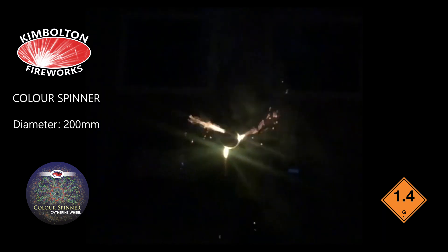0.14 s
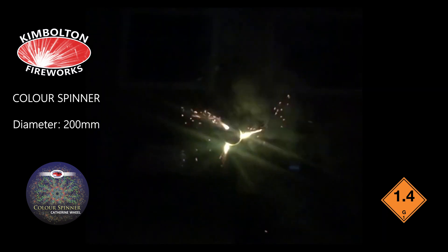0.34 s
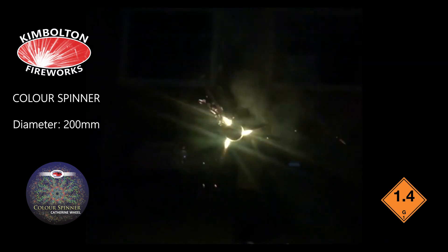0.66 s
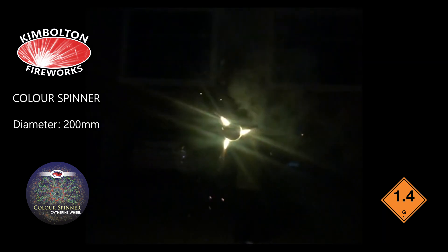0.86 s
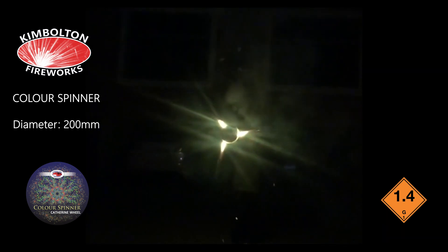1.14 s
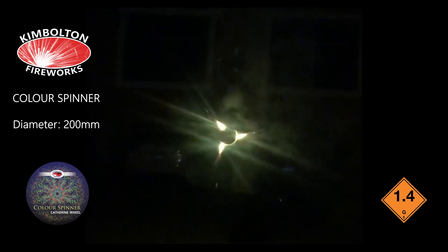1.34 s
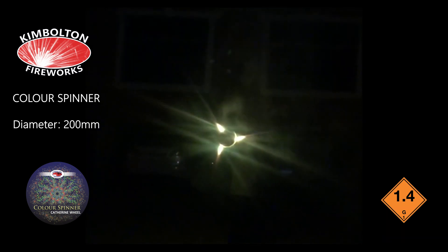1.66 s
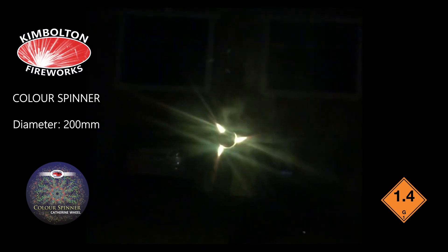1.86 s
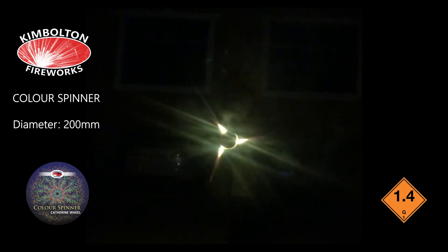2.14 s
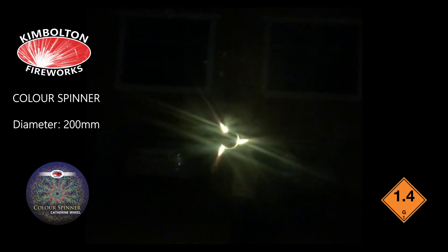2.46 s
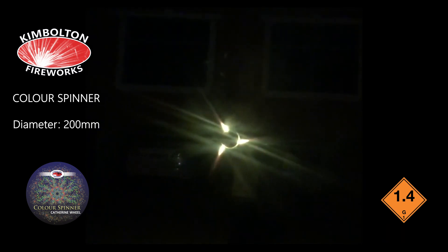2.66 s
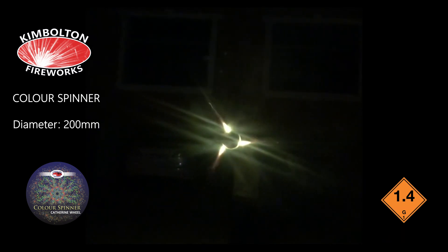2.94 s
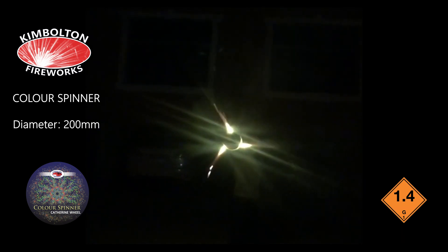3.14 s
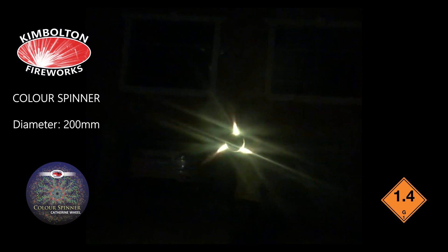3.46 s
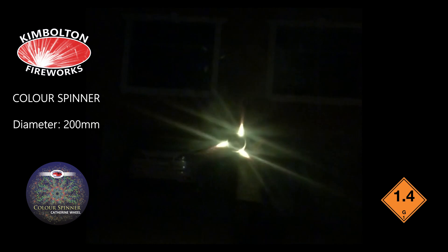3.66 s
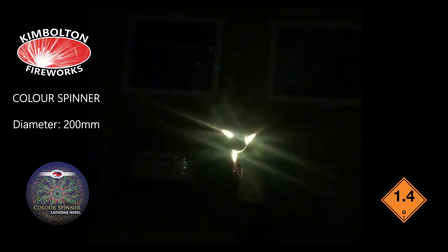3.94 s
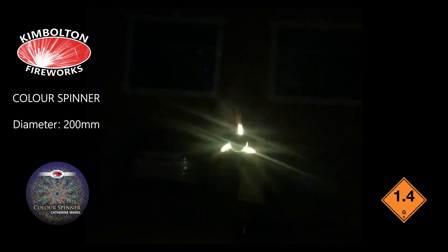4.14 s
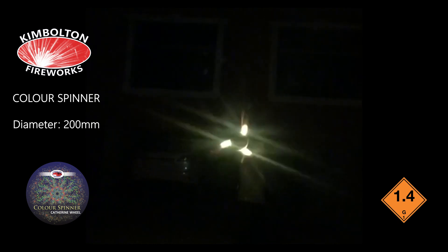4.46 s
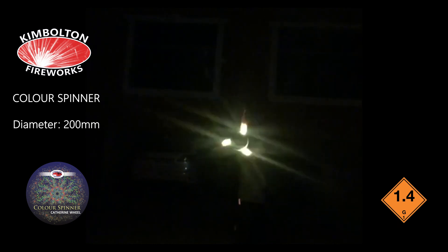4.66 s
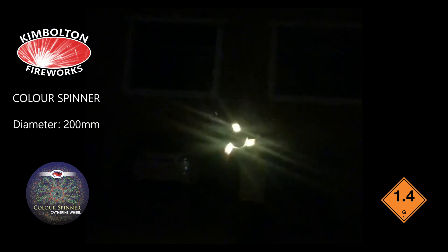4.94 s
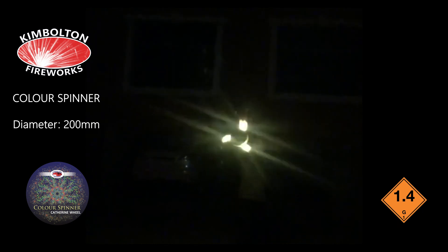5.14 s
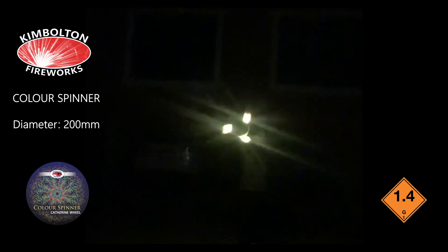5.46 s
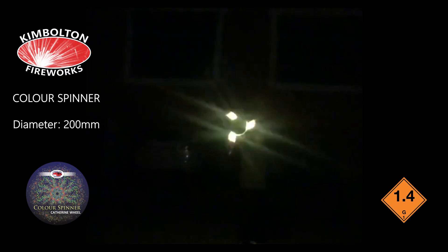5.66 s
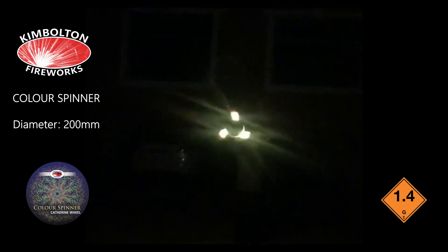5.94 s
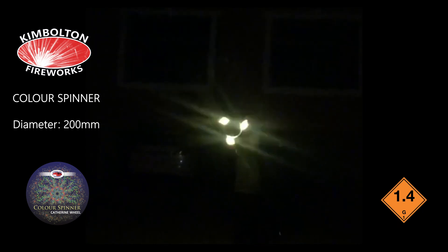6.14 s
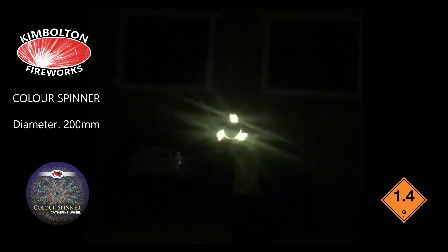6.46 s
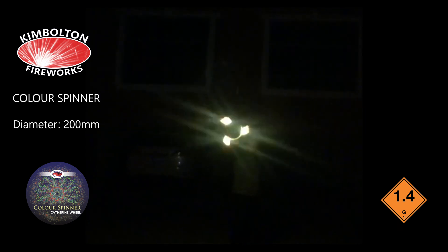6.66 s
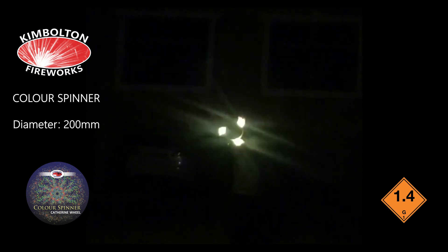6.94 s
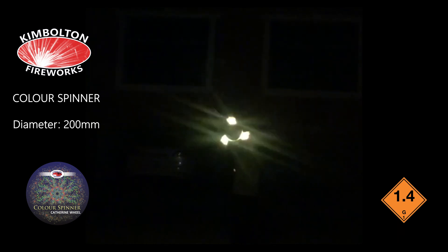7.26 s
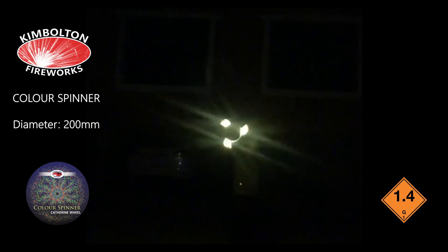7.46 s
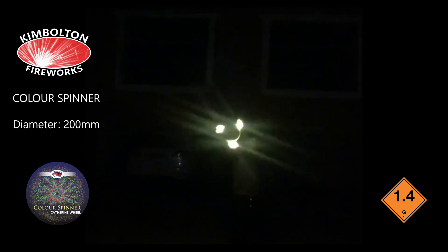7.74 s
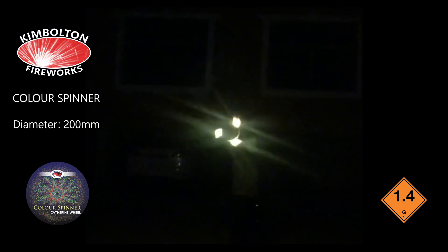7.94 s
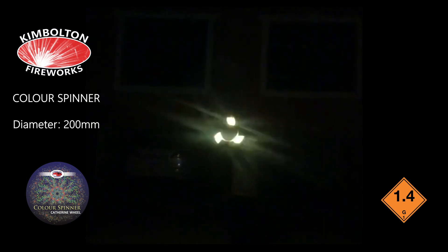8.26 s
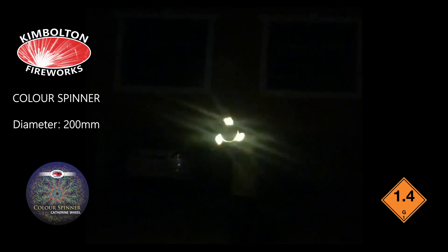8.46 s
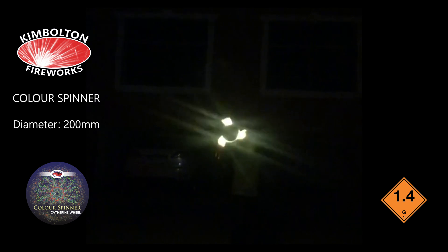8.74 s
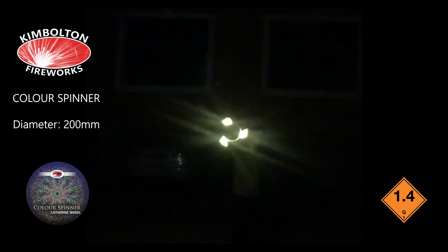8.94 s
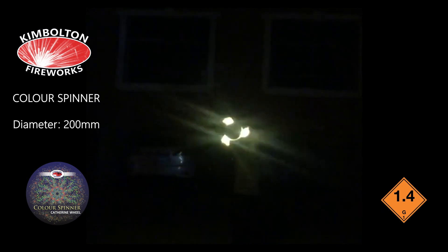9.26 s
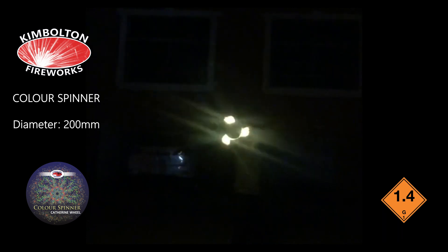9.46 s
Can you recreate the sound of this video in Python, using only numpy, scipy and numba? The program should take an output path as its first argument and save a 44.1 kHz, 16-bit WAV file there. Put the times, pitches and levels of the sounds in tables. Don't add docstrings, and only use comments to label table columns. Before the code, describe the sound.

Night, outdoors, a small three-jet firework wheel on a post some metres from one microphone. At 0 s a thin high fizz accompanies a low airy whoomph and second puff; the fuse dies around 0.3 s. Near 0.5 s further jets catch with softer puffs, a slow low bloom and a short rising hollow whoop. From 1 to 3.5 s the breathy roar and bright hiss swell strongly, with noisy ringing around the paper tubes. The wheel nudges at about 3.1 s, breaks free near 3.3 s and accelerates, turning the hiss into quickening swishes. Dull knocks of air come around 5.45 s. The rush then eases to a moderate, fast flutter, its narrower whistle sinking in pitch, broken by spits, chuffs and chokes. Low rumble, ground echo and faint distant hum remain; treble is grainy. It is still burning at 9.6 s.

```python
import sys
import numpy as np
from scipy import signal
from scipy.fft import rfft, irfft
from scipy.io import wavfile
from scipy.ndimage import uniform_filter1d, minimum_filter1d, map_coordinates
from numba import njit

SR = 44100
rng = np.random.default_rng(int(sys.argv[2]) if len(sys.argv) > 2 else 0)


def master_out(mix):
    frames = np.transpose(np.atleast_2d(mix))
    ceiling = np.clip(frames, -1, 1)
    pcm = np.round(ceiling * 32767).astype(np.int16)
    wavfile.write(sys.argv[1], SR, pcm)


def convert_level_to_amplitude(level_db):
    exponent = np.asarray(level_db, float) / 20
    return 10 ** exponent


N = 423360
TIME_S = np.arange(N) / SR


def curves(table):
    s, *columns = np.transpose(table)
    return [np.interp(TIME_S, s, column) for column in columns]


def unit(x):
    return x / np.sqrt(np.mean(x ** 2))


def white():
    return rng.standard_normal(N)


def coloured(colour):
    hz, db = np.transpose(colour)
    f = np.arange(N // 2 + 1) * SR / N + 1
    gain = convert_level_to_amplitude(np.interp(np.log(f), np.log(hz), db))
    return unit(irfft(rfft(white()) * gain, N))


@njit
def svf(x, hz, width_hz):
    y, band, low = np.empty(len(x)), 0., 0.
    for i in range(len(x)):
        g = np.tan(np.pi * hz[i] / SR)
        k = width_hz[i] / hz[i]
        v = (band + g * (x[i] - low)) / (1 + g * (g + k))
        band = 2 * v - band
        low = low + 2 * g * v
        y[i] = k * v
    return y


def ring(x, hz, width_hz):
    hz, width_hz = hz + np.zeros(N), width_hz + np.zeros(N)
    once = svf(x, hz, width_hz)
    return unit(svf(once, hz, width_hz) / np.sqrt(width_hz))


def walk(rate_hz):
    hold = int(SR / rate_hz)
    steps = np.repeat(rng.standard_normal(N // hold + 1), hold)
    x = uniform_filter1d(uniform_filter1d(steps, hold), hold)[:N]
    return unit(x - uniform_filter1d(x, size=4 * hold))


def fuse():
    end_s, fade_s = 0.33, .04
    alive = 1 / (1 + np.exp(np.clip((TIME_S - end_s) / fade_s, -30, 30)))
    return ring(white(), 11000., 4000.) * convert_level_to_amplitude(-48 + 1.3 * walk(29)) * alive


# start_s, level_db, hold_s, fall_db_per_s, rumble_db (over the whoomph)
IGNITIONS = [
    (0, -41, 0.12, 307, -14),
    (0.11, -40, .02, 300, -17),
    (0.466, -41.5, 0.17, 90, -8),
    (.53, -41, .02, 200, -8),
    (.62, -41, .03, 200, -8),
    (0.504, -43, 0.26, 12, -12),
]


def puffs(rumble=False):
    power = 0
    for s, db, hold_s, fall_db_s, low_db in IGNITIONS:
        rise_db = 82 * np.maximum(s - TIME_S, 0)
        fall_db = fall_db_s * np.maximum(TIME_S - s - hold_s, 0)
        power = power + convert_level_to_amplitude(db + rumble * low_db - rise_db - fall_db) ** 2
    return np.sqrt(power)


# pitch_hz, level_db (per Hz)
WHOOMPH_COLOUR = [(40, -28), (90, -35), (200, 2.5), (350, 1.5), (550, 1), (900, -1), (1800, -21.5)]
# time_s, pitch_hz, level_db
WHOOP = [
    (.44, 350, -70),
    (.48, 370, -52),
    (.56, 406, -53),
    (.62, 470, -47),
    (.7, 520, -54),
    (.8, 500, -70),
]


def whoomph():
    whoop_hz, whoop_db = curves(WHOOP)
    return coloured(WHOOMPH_COLOUR) * puffs() + ring(white(), whoop_hz, 49.0) * convert_level_to_amplitude(whoop_db)


# pitch_hz, level_db (per Hz)
RUMBLE_COLOUR = [(20, -56), (32, -41), (50, -14.5), (75, -8), (130, -0.5), (200, -3.5), (300, -23),
                 (600, -22.5)]
# centre_s, level_db, half_length_s, pitch_hz
KNOCKS = [(.12, -56, .025, 55), (.41, -55, .03, 140), (.52, -54, .03, 65), (.535, -51, .025, 135),
          (.635, -50, .03, 95), (.64, -55, .025, 60), (1.08, -55, .03, 110), (3.59, -53, 0.091, 132),
          (4.8, -54, .04, 140), (5.435, -47, .022, 76), (5.45, -52, .03, 135), (5.45, -52, .025, 185),
          (5.465, -59, .03, 50), (5.478, -51, .02, 102), (7.88, -60, .09, 64)]
# pitch_hz, level_db, width_hz
HUM = [
    (154.3, -66.5, 8.3),
    (211, -66.5, 8),
]


def low_air():
    air = coloured(RUMBLE_COLOUR) * np.hypot(convert_level_to_amplitude(-55), puffs(rumble=True))
    for s, db, half_s, hz in KNOCKS:
        t = TIME_S - s
        air = air + convert_level_to_amplitude(db) * np.exp(-(t / half_s) ** 4) * np.sin(2 * np.pi * hz * t)
    for hz, db, width_hz in HUM:
        air = air + convert_level_to_amplitude(db) * ring(white(), hz, width_hz)
    return air


# time_s, level_db
BURN = [(0, -43), (.12, -41), (.18, -36.5), (.35, -39.5), (.45, -42), (.75, -42.5), (1.05, -40.5),
        (1.35, -37.5), (2.0, -31.5), (2.8, -29), (3.5, -26.5), (4.9, -27.5), (5.4, -31.5), (5.9, -34),
        (7.1, -36), (8.1, -34.5), (9.6, -34)]


def burn():
    hiss_db, = curves(BURN)
    young_db = -5 * np.exp(-TIME_S / 0.55)
    roar_db = -33 + 0.27 * (hiss_db + 29.5) + young_db
    return roar_db, hiss_db


# pitch_hz, level_db (per Hz)
ROAR_COLOUR = [(120, -45), (230, -11.5), (330, -6.5), (500, -5.5), (900, -0.5), (1300, -1), (1700, 0),
               (2100, -5.5), (2600, -3), (4500, -9.5), (9000, -34.5)]


def flame_roar(flutter):
    return coloured(ROAR_COLOUR) * convert_level_to_amplitude(burn()[0] + 0.1 * flutter)


def walls():
    return coloured(ROAR_COLOUR) * convert_level_to_amplitude(burn()[0] - 6.0)


# pitch_hz, level_db (per Hz)
HISS_COLOUR = [(600, -51), (1500, -4), (2500, -2.5), (4500, -2), (6500, -1), (8500, -3.5), (10500, -11),
               (13000, -17.5), (16000, -22)]


def nozzle_hiss(flutter):
    hiss_db = burn()[1]
    flare = flare_db()
    hiss = coloured(HISS_COLOUR) * convert_level_to_amplitude(hiss_db + 0.79 * flutter + flare)
    fizz_db = -51.0 + 3.0 * (hiss_db + 31) + 0.52 * flare + walk(34)
    return hiss + ring(white(), 11040.0, 5200.0) * convert_level_to_amplitude(fizz_db)


# time_s, main_hz, upper_hz, main_width_hz
TUBE_PITCH = [(0, 3060, 4200, 1200), (.45, 2950, 3600, 1200), (1.0, 3100, 3840, 1200),
              (1.38, 3300, 3840, 1100), (1.45, 3280, 4280, 910), (1.7, 3330, 4300, 950),
              (2.2, 3400, 4000, 1150), (2.4, 3460, 5200, 1150), (3.0, 3300, 5900, 800),
              (3.9, 3110, 5900, 800), (4.7, 3060, 5830, 450), (5.4, 2900, 5440, 350),
              (5.7, 2830, 4450, 300), (6.5, 2620, 4450, 260), (7.6, 2530, 4450, 220),
              (8.5, 2450, 4450, 220), (9.6, 2260, 4450, 260)]
# time_s, ring_db (over the burn), upper_db (over the main ring)
TUBE_LEVEL = [(0, -5, 2), (.45, 1, 0), (.75, 9, -16), (1.4, 5, -2.5), (1.47, 5.5, -1), (1.9, 4, -4),
              (2.3, 3.5, -15), (3.0, 1, -3.5), (3.8, -0.5, -9), (4.2, 2, -4), (4.8, -2.5, -8),
              (5.5, -1.5, -5), (6.0, -0.5, -8), (6.5, 0, -10), (7.1, -6, -9), (7.6, -1, -10), (8.5, -5, -6),
              (9.6, -5.5, -3)]


def paper_tube(detune, sputter_db):
    main_hz, upper_hz, width_hz = curves(TUBE_PITCH)
    over_db, upper_db = curves(TUBE_LEVEL)
    main = ring(white(), main_hz * detune * (1 + 0.014 * walk(6)), width_hz) * convert_level_to_amplitude(0.5 * walk(16))
    upper_width_hz = 640 * (upper_hz / 4300) ** 2.2
    upper = ring(white(), upper_hz * detune, upper_width_hz) * convert_level_to_amplitude(upper_db + walk(14))
    tube_db = burn()[1] + over_db + sputter_db - 5
    return (main + upper) * convert_level_to_amplitude(tube_db + 1.16 * flare_db())


def clay_mouth():
    young_db = 14.5 * np.exp(-((TIME_S - .9) / 1.14) ** 2)
    return ring(white(), 4450., 640) * convert_level_to_amplitude(burn()[1] - 20 + young_db)


def lobe(turn, facing, sharp):
    sharp = sharp * np.clip(turn / 4, 0, 1)
    return np.exp(sharp * np.cos(2 * np.pi * (turn - facing))) / (1 + sharp ** 2 / 2)


def jet(turn, detune, sputter_db):
    flutter = walk(12)
    tube = clay_mouth() + paper_tube(detune, sputter_db)
    return (flame_roar(flutter) + tube * lobe(turn, 0.87, 0.34)
            + nozzle_hiss(flutter) * lobe(turn, 0.873, 0.89))


def with_ground(x, lag_ms):
    echo = map_coordinates(x, [np.arange(N) - lag_ms * SR / 1000], order=3, mode="mirror")
    return x + 0.58 * signal.lfilter([.85], [1, -.15], echo)


# centre_s, level_db, half_length_s
CHUFFS = [(.2, 3, .04), (.42, -4, .05), (1.47, 3, .05), (2.25, 1.5, .1), (3.42, 2, .1), (3.62, 3, .07),
          (3.852, 4, 0.054), (3.96, 4, .06), (4.12, 2, .05), (4.44, -5, .03), (4.55, 1, 0.053),
          (4.876, 3, .05), (4.99, -5, .04), (5.079, 3, .035), (5.16, -2, .03), (5.335, -2, 0.032),
          (5.692, 3, 0.037), (5.8, 5.5, 0.018), (5.867, -3, .03), (6.09, 7.5, .018), (6.14, -7, .02),
          (6.203, 2, .02), (6.33, -5, .04), (6.48, 6, 0.017), (6.586, 4, .015), (6.85, -5, .04),
          (6.925, 13, .02), (7.239, 4, .03), (7.583, 1, .04), (7.843, 2, .02), (8.157, 5.5, 0.023),
          (8.49, 8, 0.029), (8.559, 7, .016), (8.63, -5, .03), (8.74, -7, .04), (9.186, 7, .023),
          (9.291, 5, .045), (9.39, -5, .03), (9.468, 4.5, .022)]


def sputter():
    level_db = walk(19) * np.clip(TIME_S / 3 - 1, 0, 1)
    for s, db, half_s in CHUFFS:
        level_db = level_db + db * np.exp(-((TIME_S - s) / half_s) ** 2)
    return level_db


# peak_s, level_db (over the burn), length_s
SPITS = [(0.32, 4, 0.046), (0.623, 6.5, .03), (4.504, 3, 0.048), (5.066, 2.5, 0.024), (5.68, 0, .03),
         (5.848, 1, 0.035), (6.09, 0.5, .02), (6.467, 1.5, 0.027), (6.76, 0, 0.044), (6.916, 0.5, 0.015),
         (8.12, 3, 0.018), (8.294, 0.5, .02), (9.172, 0.5, 0.026), (9.353, 3, 0.018)]


def flare_db():
    total_db = 0
    for s, db, length_s in SPITS:
        slope_s = np.where(TIME_S < s, length_s / 4, length_s)
        total_db = total_db + db * np.exp(-np.abs(TIME_S - s) / slope_s)
    return total_db


def spin():
    nudge = .108 * np.clip((TIME_S - 3.08) / .22, 0, 1)
    free_s = np.maximum(TIME_S - 3.341, 0)
    turns_per_s, spin_up_s, lighter_per_s2 = 2.8025, 1.505, .093
    spun = turns_per_s * (free_s - spin_up_s * (1 - np.exp(-free_s / spin_up_s)))
    return .042 + nudge + spun + lighter_per_s2 * free_s ** 2 / 2


# time_s, hub_lag_ms, swing_ms (over a turn)
GROUND = [(3.0, 2.25, .12), (3.3, 2.24, .14), (4.0, 2.25, .155), (4.7, 2.3, .155), (5.7, 2.35, .13)]
# time_s, first_db, second_db, third_db
SHARE = [(0, -4, -3, 0), (.4, -5, -4, 0), (.6, 0, -10, -8), (1.1, 0, -8, -10), (1.5, 0, -3, -9),
         (3.0, 0, -2, -8), (3.3, 0, 0, -4), (5.0, 0, -3, -4), (6.0, 0, 0, -.5)]
# time_s, swing_db (over a turn)
LEAD = [
    (1.9, 0),
    (2.2, 6),
    (3.0, 7),
    (3.7, 9),
    (4.3, 8),
    (4.6, 0),
]


def wheel():
    turns, sputter_db = spin(), sputter()
    lead_db, = curves(LEAD)
    hub_ms, swing_ms = curves(GROUND)
    share = convert_level_to_amplitude(curves(SHARE))
    share = share / np.sqrt(np.sum(share ** 2, axis=0))
    total = 0
    for k, detune in enumerate((1.0, 1.008, .992)):
        turn = turns - k / 3
        height = np.cos(2 * np.pi * turn)
        wobble_ms = .025 * walk(9) * np.clip(turns, 0, 1)
        sound = share[k] * jet(turn, detune, sputter_db + lead_db * (height - .6))
        total = total + with_ground(sound, hub_ms - swing_ms * height + wobble_ms)
    return total


def scene():
    hub_ms, _ = curves(GROUND)
    mono = fuse() + with_ground(whoomph(), hub_ms) + low_air() + wheel() + walls()
    return np.array([mono, mono])


# pitch_hz, faintest_db (patch against its neighbourhood)
FAINTEST = [(2000, -13), (3500, -8.5), (4500, -7), (6000, -6.3), (8000, -4.3), (9000, -4.2), (9700, -3),
            (10600, -2.4), (11200, -3.6), (11800, -2.9), (12600, -1.2), (13150, 2.3), (13600, 2.3),
            (13800, 0), (14150, 0), (14180, 60)]


def thin_treble(x):
    f, t, z = signal.stft(x, SR, nperseg=2048, noverlap=1536)
    f = f[:, None]
    power = np.abs(z) ** 2
    patch = uniform_filter1d(uniform_filter1d(power, size=3, axis=0), size=3, axis=1)
    around = uniform_filter1d(uniform_filter1d(power, size=61, axis=0), size=15, axis=1)
    around = np.maximum(around, np.roll(around, 30, axis=0) * .55)
    luck = rng.standard_normal((65, len(t) // 2 + 1))
    luck = np.repeat(np.repeat(luck, 16, axis=0), 2, axis=1)
    spare_db = 2.5 * luck[:len(f), :len(t)] * np.clip(f / 5000 - 1.5, 0, 1)
    burn_db = np.interp(t, TIME_S, burn()[1] + 3 * flare_db())
    lift_db = .3 * (burn_db + 30) + 3.5 * np.exp(-t / 1.5) + 1.5 * luck[0, :len(t)]
    spare_db = spare_db + lift_db * (f > 12300)
    hz, faintest_db = np.transpose(FAINTEST)
    kept = patch > around * convert_level_to_amplitude(2 * (np.interp(f, hz, faintest_db) - spare_db))
    kept = minimum_filter1d(minimum_filter1d(kept.astype(float), size=3, axis=1), size=2, axis=0)
    return signal.istft(z * np.where(f > hz[0], kept, 1), SR, nperseg=2048, noverlap=1536)[1][:N]


def roll_off(x):
    return signal.sosfilt(signal.butter(12, 14300, fs=SR, output="sos"), x)


def record(dry):
    mono = thin_treble(dry[0])
    return roll_off(np.array([mono, mono]))


dry = scene()
out = record(dry)
master_out(out)
```